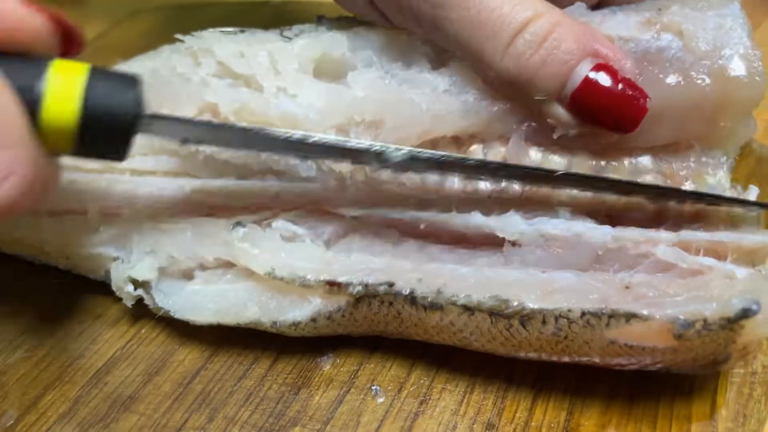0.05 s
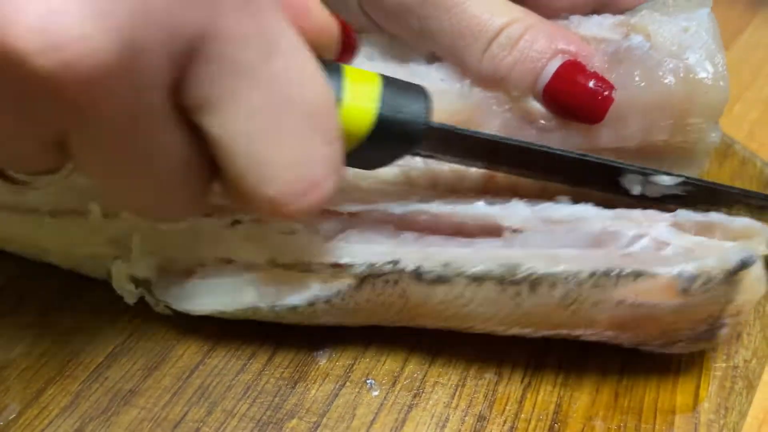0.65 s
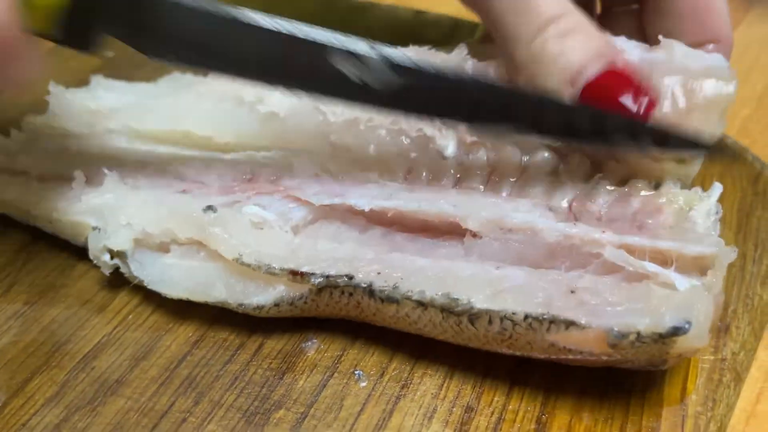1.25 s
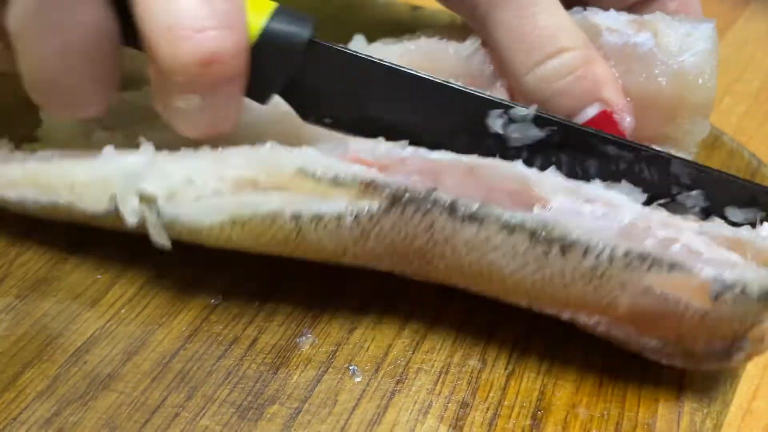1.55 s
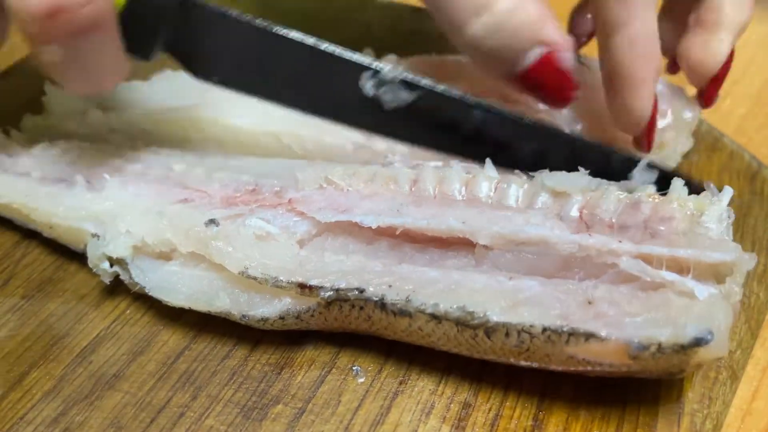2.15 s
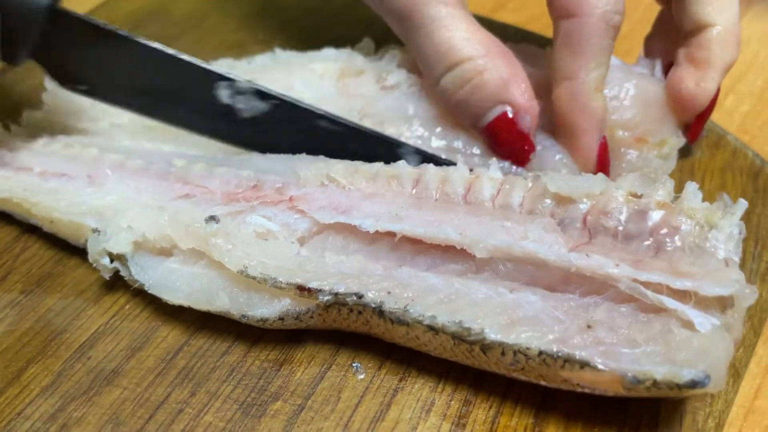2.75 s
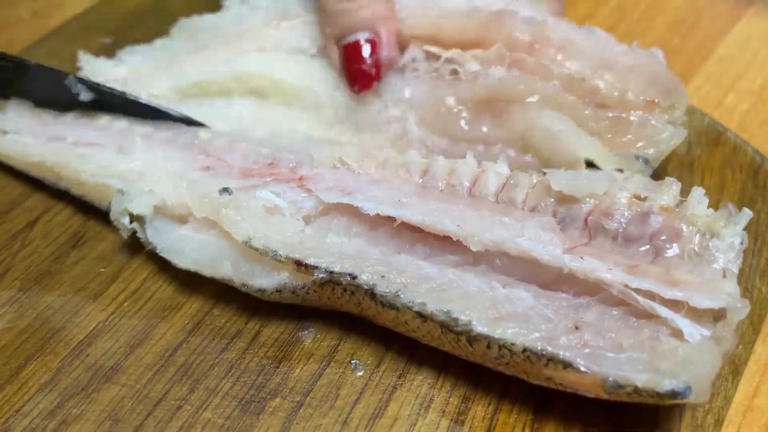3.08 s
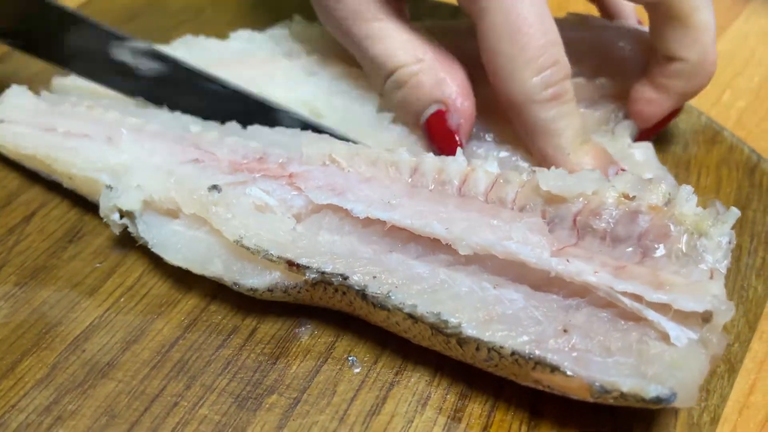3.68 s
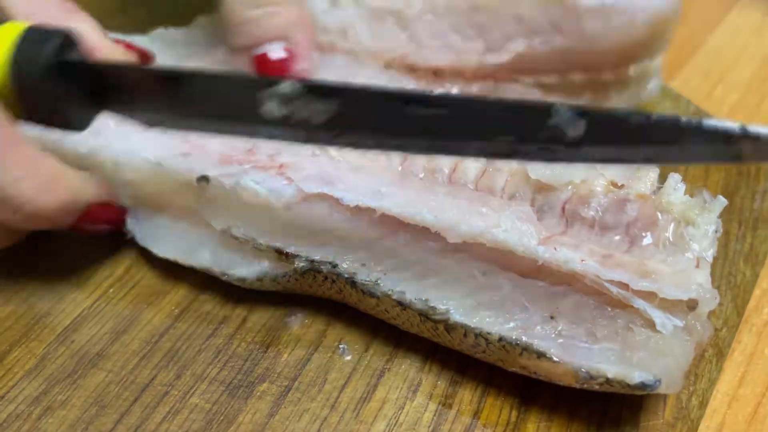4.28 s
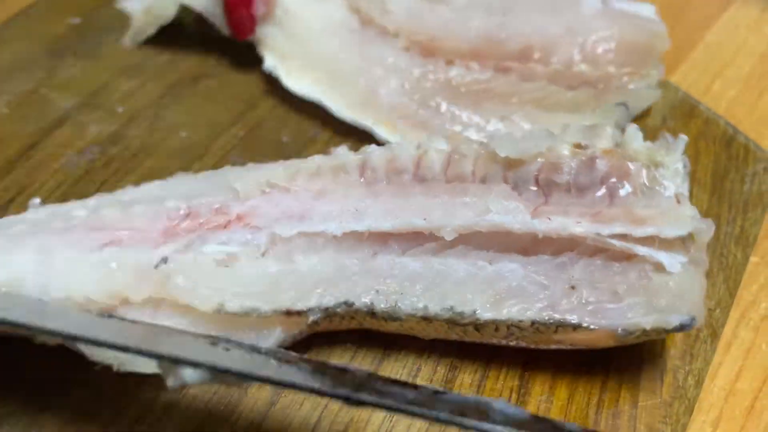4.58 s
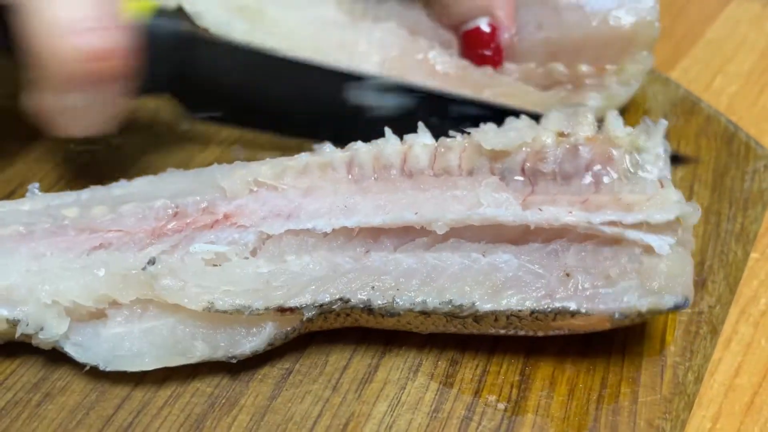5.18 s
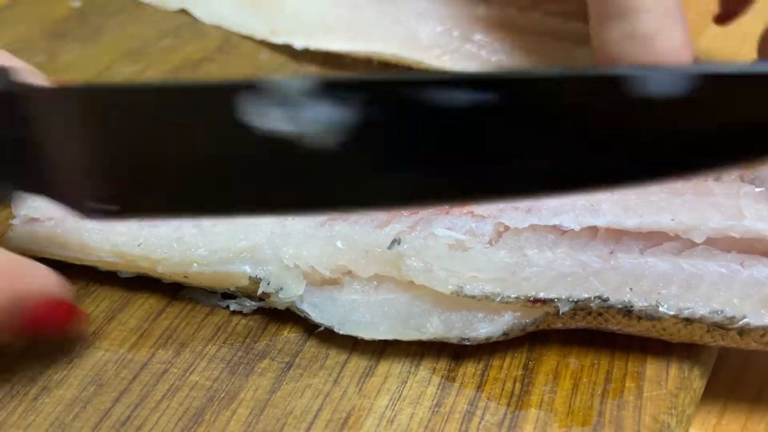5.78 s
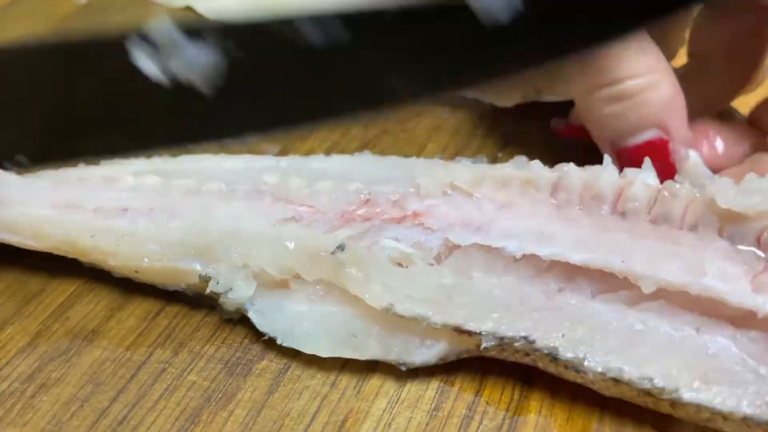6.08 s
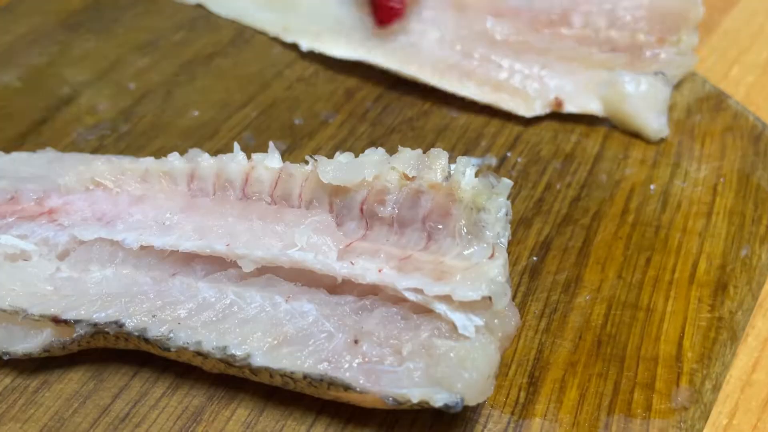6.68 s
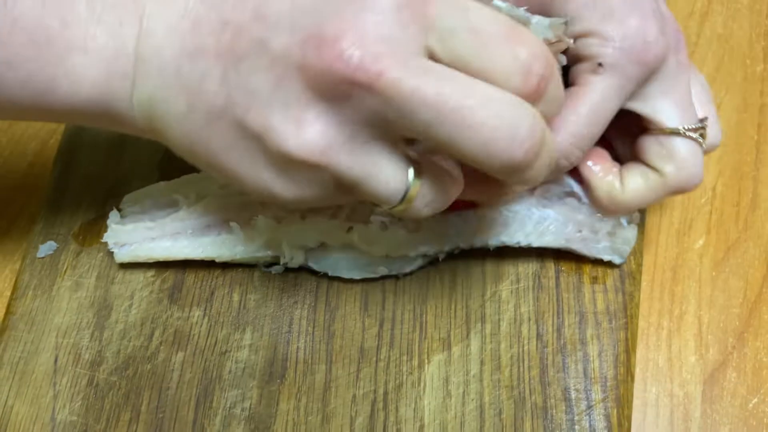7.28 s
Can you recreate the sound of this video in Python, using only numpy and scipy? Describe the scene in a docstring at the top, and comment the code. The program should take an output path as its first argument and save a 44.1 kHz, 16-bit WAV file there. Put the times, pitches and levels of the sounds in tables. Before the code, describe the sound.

A knife rasps and hisses along raw fish bones, with sharp snaps, wet crackles and dull bumps on a wooden board.

```python
"""A knife frees a raw fillet from the backbone of a fish on a wooden board, close by in a quiet kitchen.
Each stroke gathers speed, slackens and stops: bone rasps and squeaks, the steel hisses and rings.
Pin bones snap; wet flesh fizzes, squelches and pops as tiny pockets part.
The hands press and bump the board, which booms and rumbles on its table; a faint hum swells and fades."""
import sys
import numpy as np
from scipy import signal
from scipy.fft import rfft, irfft, next_fast_len
from scipy.io import wavfile
from scipy.ndimage import uniform_filter1d, map_coordinates

SR = 44100
rng = np.random.default_rng(int(sys.argv[2]) if len(sys.argv) > 2 else 0)


def file_out(sig):
    """Save sig as 16-bit WAV at sys.argv[1]."""
    # one column per channel
    cols = np.atleast_2d(sig).T
    # limit, then scale
    lim = np.clip(cols, -1, 1)
    pcm = np.round(lim * 32767).astype(np.int16)
    wavfile.write(sys.argv[1], SR, pcm)


N = 328104
TIME = np.arange(N) / SR


# Spectra of edge hiss, bone rasp and wet fizz: freq_hz, density_db
HISS_SPECTRUM = [(1800, -7), (3000, 5.5), (4000, 6.5), (5000, 11), (6000, 9.5), (7200, 7.5), (9000, -11.5)]
RASP_SPECTRUM = [(400, -12.5), (850, -4.5), (1550, -2.5), (1950, 2.5), (2400, -3), (2850, -4), (3800, -9),
                 (6000, -35)]
FIZZ_SPECTRUM = [(4500, -12.5), (8500, 6), (13000, 4), (16000, -3.5)]

def knife(sticky_db=-9.5, grip_db=2.5):
    """Hard strokes tear densely and chatter over the ribs; light ones catch and let go in wet ticks."""
    hiss_db, rasp_db, fizz_db = cutting_levels()
    tears_per_s = 350 * undb(0.5 * np.maximum(hiss_db + 74, -20))
    lightness = 1 / np.sqrt(1 + tears_per_s / 500)
    grain = tears(tears_per_s, spread_db=5.5, decay_s=0.003, smooth_share=0.3)
    ticks = wet_pockets(rate_per_s=80, spread_db=5, cycles=1) * undb(sticky_db) * lightness
    hiss = colour(grain * noise() + ticks, HISS_SPECTRUM) * undb(hiss_db) * pan(2.8)
    rasp = colour(grain * noise() + ticks, RASP_SPECTRUM) * undb(rasp_db) * pan(2.3)
    fizz = colour(grain * noise() + ticks, FIZZ_SPECTRUM) * undb(fizz_db)
    grip = undb(grip_db * lightness * walk(40) - 2.5)
    chatter = lightness + (1 - lightness) * ribs()
    return grip * chatter * blade_ring(sliding_contact(hiss + rasp + fizz))


# Knife strokes: start_s, rise_s, hold_s, hiss_db, rasp_re_hiss_db, fizz_re_hiss_db
STROKES = [(0.0, 0.013, 0.0068, -58.5, 21, 16.5), (0.119, 0.15, 0.055, -38, -5, -6),
           (.245, 0.013, 0.052, -46, 5, 16), (.485, 0.037, 0.039, -52.5, -4.5, -6),
           (.555, 0.08, 0.016, -41.5, 0, -2.5), (0.68, 0.059, 0.14, -30, -5, -7),
           (.85, 0.037, 0.039, -32.5, -0.5, -0.5), (1.238, 0.0099, 0.021, -50.5, -3, -5),
           (1.275, 0.083, 0.014, -39, 0.5, -1), (1.412, 0.032, 0.029, -25, -5.5, -5),
           (1.5, 0.048, 0.0096, -28.5, -8, -6.5), (1.588, 0.027, 0.066, -30.5, -13.5, -3.5),
           (1.777, 0.022, 0.0044, -53, -1.5, 0), (1.831, 0.032, 0.0029, -71.5, 14, -14),
           (1.943, 0.0067, 0.068, -57, -9.5, -0.5), (2.072, 0.024, 0.014, -42.5, -28, -10),
           (2.11, 0.0069, 0.017, -47.5, -5.5, -4), (2.275, 0.021, 0.014, -50, -11, -7),
           (2.355, 0.033, 0.015, -51, -10.5, -1), (2.441, 0.0078, 0.046, -49, -9.5, -2.5),
           (2.515, 0.057, 0.079, -46.5, -1.5, -3.5), (2.752, 0.032, 0.091, -52.5, 3.5, -2),
           (3.571, 0.068, 0.341, -44.5, -1, -6), (4.71, 0.027, 0.03, -60.5, 7.5, -7),
           (5.045, 0.064, 0.02, -56.5, -0.5, -7), (5.135, 0.094, 0.071, -52.5, 7.5, -1.5),
           (5.33, 0.055, 0.061, -50.5, 1.5, -3), (5.475, 0.069, 0.063, -52, 5, -0.5)]
# Flesh peeling from blade and fingers: start_s, length_s, hiss_db
PEELS = [(0.933, 0.11, -60.5), (1.704, 0.048, -62.5), (1.999, 0.066, -69), (2.21, 0.096, -65.5),
         (2.3, 0.15, -70.5), (2.684, 0.033, -65), (2.881, .14, -66), (3.032, 0.13, -72.5),
         (3.495, 0.036, -66), (4.086, 0.04, -62), (4.219, .16, -61), (4.414, 0.1, -60), (4.598, 0.066, -69),
         (4.782, .06, -64.5), (5.819, 0.15, -63.5), (5.963, 0.086, -61.5), (6.09, 0.05, -57.5),
         (6.238, .2, -68), (6.444, 0.1, -66.5), (6.679, 0.23, -64.5), (6.957, 0.039, -62),
         (7.044, 0.32, -86.5), (7.253, 0.3, -62.5)]

def cutting_levels(peel_rise_s=0.023, peel_rasp_db=-4, peel_fizz_db=-0.5):
    """Hiss, rasp and fizz in dB: the blade saws in strokes; between them the flesh peels softly."""
    moves = []
    for start_s, rise_s, hold_s, db, rasp_db, fizz_db in STROKES:
        envelope = gesture(start_s, rise_s, hold_s, hold_db_per_s=-41, stop_db_per_s=-780)
        moves.append((envelope, (db, db + rasp_db, db + fizz_db)))
    for start_s, length_s, db in PEELS:
        hold_s = length_s - peel_rise_s
        envelope = gesture(start_s, peel_rise_s, hold_s, hold_db_per_s=-22.5, stop_db_per_s=-406.5)
        moves.append((envelope, (db, db + peel_rasp_db, db + peel_fizz_db)))
    return layer_levels(moves)


def ribs(rate_hz=95, bite_db=5):
    """The edge catches rib after rib at an uneven pace: a bite, then a glide. Mean power 1."""
    phase = np.cumsum(rate_hz * np.exp(0.5 * walk(rate_hz))) / SR % 1
    bite = undb(bite_db * (1 - phase) ** 2)
    return bite / np.sqrt(np.mean(bite ** 2))


def sliding_contact(scrape, depth_db=3, rate_hz=25, bands=20):
    """The contact point slides along the blade, so each band's strength keeps shifting."""
    size = 2 * next_fast_len(N // 2 + 1)
    spectrum, out = rfft(scrape, size), 0
    freq_hz = np.arange(size // 2 + 1) * SR / size
    band_index = np.interp(freq_hz, np.geomspace(1200, 14000, bands), np.arange(bands))
    for k in range(bands):
        band = irfft(spectrum * np.maximum(1 - abs(band_index - k), 0), size)[:, :N]
        out = out + band * undb(depth_db * walk(rate_hz))
    return out


# Blade resonances: freq_hz, level_re_scrape_db
BLADE_MODES = [(4220, -8.5), (5250, -8.5), (6000, -20.5), (7850, -4), (10400, -6), (15300, 8)]

def blade_ring(scrape, q=26, sway_db=4):
    """The steel rings in narrow bands; each comes and goes as the flesh damps it."""
    out = scrape
    for freq_hz, level_db in BLADE_MODES:
        ring = signal.lfilter(*signal.iirpeak(freq_hz, q, fs=SR), scrape)
        out = out + ring * undb(level_db + sway_db * walk(6.3))
    return out / np.sqrt(2)


# Snap spectrum before its resonance: freq_hz, density_db
SNAP_SPECTRUM = [(300, 10.5), (1200, -1.5), (6000, -7.5), (16000, -21)]
# Bone snaps, blade ticks and wet smacks: time_s, level_db, centre_hz, decay_s, fizz_re_snap_db
CRACKS = [(0.006, -21, 5000, 0.002, -21), (0.2588, -19, 6900, 0.0012, -22), (0.259, -29, 6100, 0.0077, -17),
          (0.8715, -21, 6450, 0.0084, -7.5), (0.881, -21, 6200, 0.0015, -19), (1.1, -66.5, 6740, 0.014, 15),
          (1.174, -61.5, 6460, 0.014, 4), (1.225, -46.5, 5630, 0.006, -11.0),
          (1.2477, -40, 6100, 0.017, -9), (1.3592, -24.5, 3700, 0.003, -3),
          (1.988, -43.5, 5500, 0.013, -18), (2.196, -40.5, 5730, 0.0037, -0.5),
          (2.4971, -36, 1240, 0.0016, -25), (3.281, -41, 4440, 0.0023, -34),
          (3.633, -39.5, 5600, 0.0083, -7), (3.724, -35, 2000, 0.0049, -25), (4.052, -45, 2430, 0.011, -19),
          (4.173, -43.5, 3200, 0.002, -11), (4.206, -45, 3140, 0.0081, -12),
          (4.2274, -33, 4000, 0.0037, -38), (4.665, -43, 3000, 0.014, -19),
          (5.052, -52.5, 6700.0, 0.0079, 3.5), (5.221, -40.5, 1720, 0.011, -19),
          (5.657, -45.5, 1750, 0.016, -39.5), (5.7869, -47, 1900, 0.0039, -14),
          (5.85, -48, 2520, 0.015, -9), (6.067, -50.5, 1700, 0.018, -20), (6.297, -46.5, 3770, 0.007, -2),
          (6.668, -36.5, 2550, 0.0055, -36), (6.677, -33, 2880, 0.0018, -33),
          (6.834, -47.5, 1450, 0.0017, -27), (6.866, -51, 1920, 0.0094, -7),
          (7.397, -28, 5300, 0.00066, 1.5)]

def cracks(q=1.95, rise_s=0.00054, tail_db=-25, tail_s=0.022, onset_db=-16, onset_s=0.0026, count=3600):
    """A sharp snap in a broad resonance, with a soft onset and a wet spray."""
    out, t = np.zeros((2, N)), (np.arange(count) - count // 6) / SR
    age = np.maximum(t, 0)
    attack = 1 - np.exp(-age / rise_s)
    tail = undb(tail_db) * np.exp(-age / tail_s)
    onset = undb(onset_db) * np.exp(-abs(t) / onset_s)
    for time_s, level_db, centre_hz, decay_s, fizz_db in CRACKS:
        burst = attack * (np.exp(-0.5 * (age / decay_s) ** 2) + tail)
        envelope = burst / burst.max() + onset
        snap = colour(envelope * noise(count), SNAP_SPECTRUM, centre_hz, q) * pan(0.5)
        spray = colour(envelope * noise(count), FIZZ_SPECTRUM) * undb(fizz_db)
        add(out, time_s + t[0], undb(level_db) * (snap + spray) / np.sqrt(2))
    return out


def squelch(gain_db=-7):
    """Wet pockets open where the blade works deep along the bone."""
    hiss_db, rasp_db, _ = cutting_levels()
    depth_db = np.minimum(rasp_db - hiss_db, 0)
    pockets = wet_pockets(rate_per_s=260, spread_db=2.5, cycles=12, lo_hz=1300, hi_hz=4800, count=2400)
    return pockets * undb(gain_db + rasp_db + depth_db)


# Edge squeaks: start_s, length_s, level_db, pitch_hz
SQUEAKS = [(0.589, .065, -43, 2610), (1.243, 0.095, -49, 2050), (3.665, 0.18, -45.5, 1960),
           (3.836, 0.043, -45, 3400), (5.208, 0.022, -43, 1654), (5.503, 0.15, -51.5, 2264)]

def squeaks(flutter_hz=190, drift=0.01186):
    """The edge drags on bone: a rough, unsteady tone that swells and fades."""
    envelope, held_hz = np.zeros(N), np.zeros(N)
    for start_s, length_s, level_db, pitch_hz in SQUEAKS:
        envelope += undb(level_db) * np.sin(np.pi * np.clip((TIME - start_s) / length_s, 0, 1))
        held_hz[TIME >= start_s] = pitch_hz
    phase = 2 * np.pi * np.cumsum(held_hz * np.exp(drift * walk(25))) / SR
    flutter = signal.sosfilt(signal.butter(2, flutter_hz, fs=SR, output="sos"), noise())
    return envelope * flutter / flutter.std() * np.sin(phase)


def crackle(gain_db=-4, drive_cap_db=-57):
    """Sticky flesh parts in a fine, dense crackle of tiny films; hard strokes add no more of it."""
    hiss_db, _, fizz_db = cutting_levels()
    drive_db = np.minimum(np.maximum(hiss_db, fizz_db), drive_cap_db)
    films = wet_pockets(rate_per_s=520, spread_db=3, cycles=3, hi_hz=15000)
    return films * undb(drive_db + gain_db)


# Single wet pockets parting under blade and fingers: start_s, peak_db, pitch_hz
POPS = [(0.432, -53, 7000), (1.947, -53, 5570), (2.0852, -38, 5000), (2.222, -48, 5600),
        (2.2952, -44, 5170), (2.38, -42.5, 5600), (2.45, -37, 11300), (2.5983, -36.5, 5600),
        (2.7826, -39.5, 5600), (2.838, -52, 4000), (3.174, -55.5, 990), (4.3303, -51, 2850),
        (4.4243, -53, 10300), (4.4524, -47, 3100), (4.495, -42, 8600), (4.611, -55.5, 2390),
        (4.82, -54, 7500), (4.849, -51.5, 5100), (5.884, -47, 4100), (6.1786, -47, 3320),
        (6.261, -47, 4750), (6.3801, -58, 1620), (6.769, -46, 10000), (6.9542, -57, 3550),
        (7.0823, -58, 3530), (7.1636, -60, 4370), (7.2791, -45, 4280), (7.314, -42.5, 6300),
        (7.427, -40, 4100)]

def pops(q=5.6, decay_s=0.0039, count=1200):
    """A wet film breaks with one tiny click, coloured by the pocket under it."""
    out, t = np.zeros((2, N)), np.arange(count) / SR
    for start_s, peak_db, pitch_hz in POPS:
        click = colour(np.exp(-t / decay_s) * noise(count), [(1000, 0), (SR / 2, 0)], pitch_hz, q)
        add(out, start_s, undb(peak_db) * click / abs(click.mean(0)).max())
    return out


def wet_pockets(rate_per_s, spread_db, cycles, lo_hz=2200, hi_hz=12000, count=600):
    """Flesh lets go in tiny pitched pockets: few cycles tick, more squelch. Mean power 1."""
    out, t = np.zeros((2, N)), np.arange(count) / SR
    for when, pitch, size, left, right in rng.random((int(rate_per_s * N / SR), 5)):
        pitch_hz = lo_hz * (hi_hz / lo_hz) ** pitch
        age = t * pitch_hz / cycles
        tick = age * np.exp(-age) * np.sin(2 * np.pi * (pitch_hz * t + np.array([[left], [right]])))
        size_db = -spread_db * np.log(max(size, np.exp(-2)))
        add(out, when * N / SR, tick * np.sqrt(pitch_hz) * undb(size_db))
    return out / out.std()


# Spectra of rubbing flesh and rumbling board: freq_hz, density_db
FLESH_SPECTRUM = [(100, -2.5), (180, 4), (300, 1), (400, -2), (540, -8.5), (800, -13.5), (1300, -17.5)]
BOARD_SPECTRUM = [(20, -7.5), (40, -25.5), (60, -3.5), (77, -3), (100, -14), (220, -24)]
# Hands leaning on the fish: start_s, length_s, rub_db
PUSHES = [(0.18, 0.12, -58), (0.571, 0.079, -61.5), (0.695, 0.26, -50), (1.31, 0.25, -54),
          (1.582, 0.058, -50.5), (1.798, 0.1, -62.5), (1.967, 0.74, -72), (2.477, 0.22, -54.5),
          (2.748, 0.13, -49), (2.904, 0.16, -67), (3.041, 0.29, -66), (3.466, 0.063, -56.5),
          (3.562, 0.35, -50), (3.959, 0.418, -62.5), (4.411, 0.543, -64), (4.69, 0.16, -59),
          (5.037, 0.62, -55), (5.795, 0.1, -55), (5.95, 0.41, -72), (6.64, 0.31, -69.5),
          (7.183, 0.14, -73.5)]

def hands(rise_s=0.04, rumble_re_rub_db=3):
    """Flesh rubs on the wood in soft, uneven slips; the board rumbles under the push."""
    moves = []
    for start_s, length_s, db in PUSHES:
        envelope = gesture(start_s, rise_s, length_s - rise_s, hold_db_per_s=2, stop_db_per_s=-290)
        moves.append((envelope, (db, db + rumble_re_rub_db)))
    rub_db, rumble_db = layer_levels(moves)
    slips = tears(rate_per_s=110, spread_db=3.5, decay_s=0.006, smooth_share=0.2)
    rub = colour(slips * noise(), FLESH_SPECTRUM) * undb(rub_db + 4.4 * walk(31))
    rumble = colour(noise(), BOARD_SPECTRUM) * undb(rumble_db + 3.1 * walk(23))
    return rub + rumble


# Blade and fish knocking on the wood: start_s, level_db, pitch_hz, t60_s
KNOCKS = [(4.069, -47.5, 403, 0.076), (1.54, -36.5, 189.7, 0.17), (1.608, -27, 179, 0.12),
          (1.657, -37, 244, 0.12), (2.124, -49, 462, 0.078), (2.465, -38.5, 350, 0.082),
          (2.493, -36, 440, 0.14), (2.496, -38.5, 666, 0.081), (3.283, -36, 304, 0.086),
          (3.284, -35, 184, 0.075), (3.516, -41.5, 436, 0.07), (3.859, -35, 239, 0.062),
          (4.83, -36.5, 360, 0.046), (5.856, -42, 399, 0.14), (6.3, -35.5, 396, 0.016),
          (6.669, -44, 381, 0.1), (7.395, -46, 1460, 0.14)]

def knocks(overtone_ratio=1.55, overtone_db=-7, rattle_db=-6, right_lead_rad=np.pi / 3, count=9000):
    """Struck wood, damped by the flesh: two short modes and a dull rattle."""
    out, t = np.zeros((2, N)), np.arange(count) / SR
    for start_s, level_db, pitch_hz, t60_s in KNOCKS:
        envelope = (1 - np.exp(-t * pitch_hz * 2)) * undb(-60 * t / t60_s)
        phase = 2 * np.pi * pitch_hz * t + np.array([[0], [right_lead_rad]])
        modes = np.sin(phase) + undb(overtone_db) * np.sin(overtone_ratio * phase)
        rattle = colour(envelope * noise(count), [(100, -2.5), (4000, -14.5)], pitch_hz, q=2)
        add(out, start_s, undb(level_db) * (envelope * modes + undb(rattle_db) * rattle))
    return out


# Shoves and bumps of the board: time_s, level_db, pitch_hz, swell_s
THUMPS = [(0.017, -32, 68.6, 0.0014), (0.23, -26.5, 86.6, 0.017), (1.611, -28.5, 76, .002),
          (1.884, -30.5, 64.3, 0.0035), (3.290, -28.5, 69, 0.0023), (3.799, -37, 78, .012),
          (3.867, -27, 81.5, 0.0036), (4.472, -40.5, 85.4, 0.0033), (4.857, -27.5, 71.8, 0.0036),
          (7.245, -46, 89, 0.005)]

def thumps(decay_s=0.019, right_lag_rad=np.pi / 2, count=16000):
    """A push swells into the lowest mode of board and table, which dies in a few cycles."""
    out, t = np.zeros((2, N)), (np.arange(count) - count / 2) / SR
    for time_s, level_db, pitch_hz, swell_s in THUMPS:
        envelope = np.exp(-np.logaddexp(-2 * t / swell_s, t / decay_s))
        mode = np.sin(2 * np.pi * pitch_hz * t - np.array([[0], [right_lag_rad]]))
        add(out, time_s + t[0], undb(level_db) * envelope / envelope.max() * mode)
    return out


def board_reflection(direct, delays_s=(0.00135, 0.0021), gain=0.27, drift=0.08):
    """The board mirrors the sound to each side a little late; the comb shifts as the knife moves."""
    echo = np.zeros((2, N))
    for side, delay_s in enumerate(delays_s):
        source_s = TIME - delay_s * (1 + drift * walk(2))
        echo[side] = map_coordinates(direct[side], [source_s * SR], order=2)
    return (direct + gain * echo) / np.hypot(1, gain)


def room_tail(direct, t60_s=0.13, wet_db=-22, count=12000):
    """Worktop and cupboards give a short, faint tail, duller in the treble."""
    t = np.arange(count) / SR
    tail = uniform_filter1d(noise(count), 2) * t * undb(-60 * t / t60_s)
    tail /= np.sqrt(np.sum(tail ** 2) / 2)
    return undb(wet_db) * signal.fftconvolve(direct, tail, axes=1)[:, :N]


# Hum envelope: time_s, level_db
HUM_LEVELS = [(2.4, -86), (4.2, -56.5), (5.45, -64.5), (5.8, -43), (5.95, -54), (6.8, -71)]

def hum(pitch_hz=183, waver=0.012, right_lead_rad=2.25):
    """One faint low tone that wavers a little."""
    phase = 2 * np.pi * np.cumsum(pitch_hz * (1 + waver * walk(6.9))) / SR
    level_db = np.interp(TIME, *np.transpose(HUM_LEVELS)) + 1.6 * walk(14)
    return undb(level_db) * np.sin(phase + np.array([[0], [right_lead_rad]]))


# Kitchen background spectrum: freq_hz, density_db
KITCHEN_SPECTRUM = [(20, -8.5), (75, 8), (200, 5), (600, -20), (4000, -22.5), (16000, -31.5)]

def kitchen(level_db=-68):
    """Steady background noise, mostly bass."""
    return undb(level_db) * colour(noise(), KITCHEN_SPECTRUM)


def gesture(start_s, rise_s, hold_s, hold_db_per_s, stop_db_per_s):
    """Envelope of one hand move: it gathers speed, holds on a slope, then stops."""
    age = TIME - start_s
    rise = np.sin(np.pi / 2 * np.clip(age / rise_s, 0, 1)) ** 2
    held_s = np.clip(age - rise_s, 0, hold_s)
    stopped_s = np.clip(age - rise_s - hold_s, 0, 1)
    return rise * undb(hold_db_per_s * held_s + stop_db_per_s * stopped_s)


def layer_levels(moves):
    """Power sum in dB for each layer; a move is (envelope, dB of each layer)."""
    envelopes, levels_db = zip(*moves)
    return 10 * np.log10(undb(levels_db).T ** 2 @ np.array(envelopes) ** 2 + 1e-12)


def tears(rate_per_s, spread_db, decay_s, smooth_share):
    """Envelope of tiny ruptures of uneven size over a share of smooth sliding. Mean power 1."""
    ruptures = rng.random(N) < rate_per_s / SR
    size_db = spread_db * np.clip(rng.standard_normal(N), -2, 2)
    power = ruptures * undb(size_db) ** 2 / rate_per_s
    power = signal.lfilter([1], [1, -np.exp(-1 / (decay_s * SR))], power)
    return np.sqrt(smooth_share + (1 - smooth_share) * power / power.mean())


def colour(x, spectrum, ring_hz=None, q=2):
    """Causal filter through (Hz, dB) points, with an optional resonance; white noise keeps its power."""
    size = 2 * next_fast_len(x.shape[-1] // 2 + 512)
    bin_hz = np.maximum(np.arange(size // 2 + 1) * SR / size, 1)
    hz, db = np.transpose(spectrum)
    octaves_outside = np.maximum(np.log2(hz[0] / bin_hz), 0) + np.maximum(np.log2(bin_hz / hz[-1]), 0)
    rolloff_db = np.minimum(20 * octaves_outside, 50)
    gain = undb(np.interp(np.log(bin_hz), np.log(hz), db) - rolloff_db)
    if ring_hz is not None:
        gain /= np.hypot(1, q * (bin_hz / ring_hz - ring_hz / bin_hz))
    cepstrum = irfft(np.log(gain / np.sqrt(np.mean(gain ** 2))))
    cepstrum[1:size // 2] *= 2  # fold to minimum phase
    cepstrum[size // 2 + 1:] = 0
    return irfft(rfft(x, size) * np.exp(rfft(cepstrum)), size)[:, :x.shape[-1]]


def noise(count=N):
    """Uncorrelated left and right white noise."""
    mid, side = rng.standard_normal((2, count))
    return np.array([mid + side, mid - side]) / np.sqrt(2)


def walk(rate_hz):
    """Smooth random curve with a spread near 1."""
    step = max(int(SR / rate_hz), 1)
    stairs = np.repeat(rng.standard_normal(N)[:N // step + 1], step)[:N]
    return np.sqrt(3 / 2) * uniform_filter1d(stairs, step)


def undb(db):
    """Decibels to gain."""
    return 10 ** (np.asarray(db) / 20)


def pan(left_re_right_db):
    """Left and right gains."""
    return undb(np.array([[0.5], [-0.5]]) * left_re_right_db)


def add(out, start_s, sound):
    """Mix a sound in at start_s."""
    offset = int(start_s * SR)
    first, end = max(offset, 0), min(offset + sound.shape[1], N)
    if end > first:
        out[:, first:end] += sound[:, first - offset:end - offset]


def scene():
    """Knife, hands and board in the still kitchen."""
    cutting = knife() + cracks() + squelch() + squeaks() + crackle() + pops()
    work = board_reflection(cutting) + hands() + knocks() + thumps()
    return work + room_tail(work) + hum() + kitchen()


def record(dry):
    """Steep low-pass on the top treble."""
    cutoff_hz = 15950
    return signal.sosfilt(signal.ellip(12, 0.1, 80, cutoff_hz, fs=SR, output="sos"), dry)


dry = scene()
out = record(dry)
file_out(out)
```